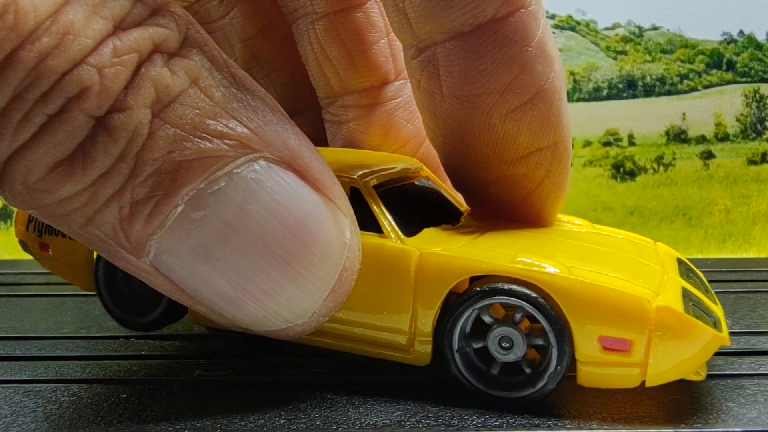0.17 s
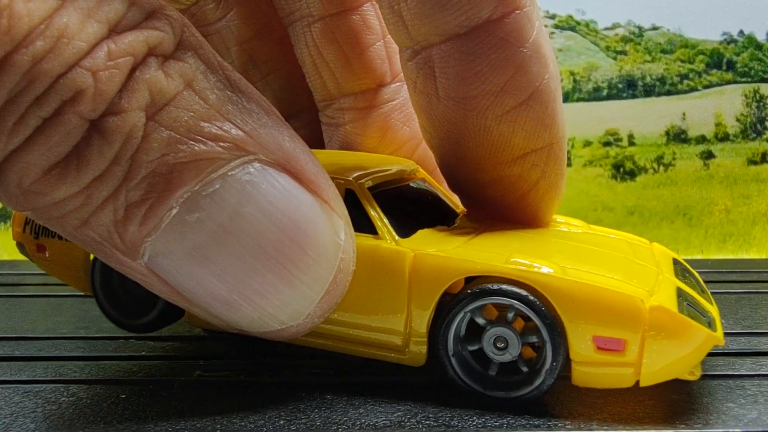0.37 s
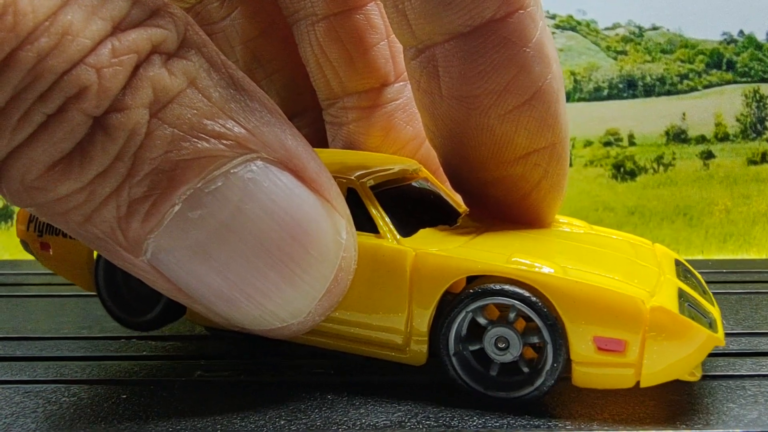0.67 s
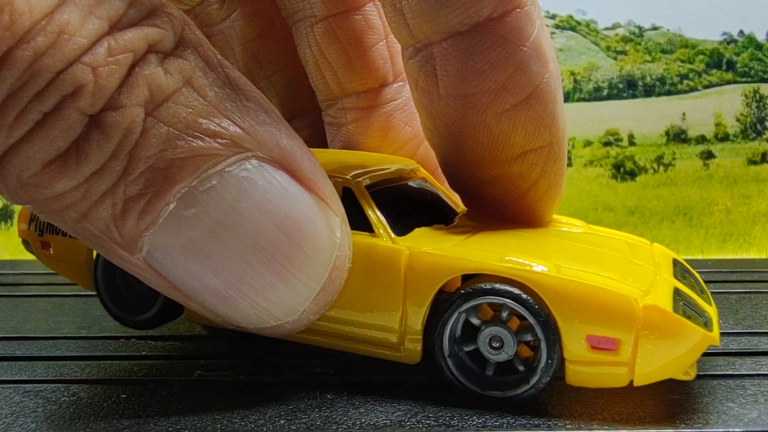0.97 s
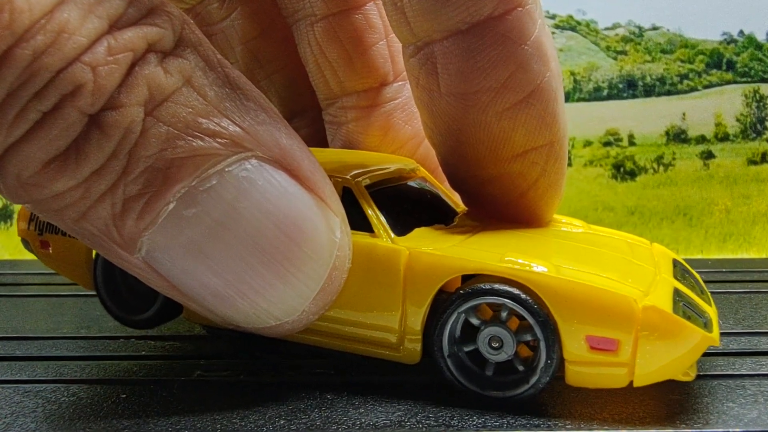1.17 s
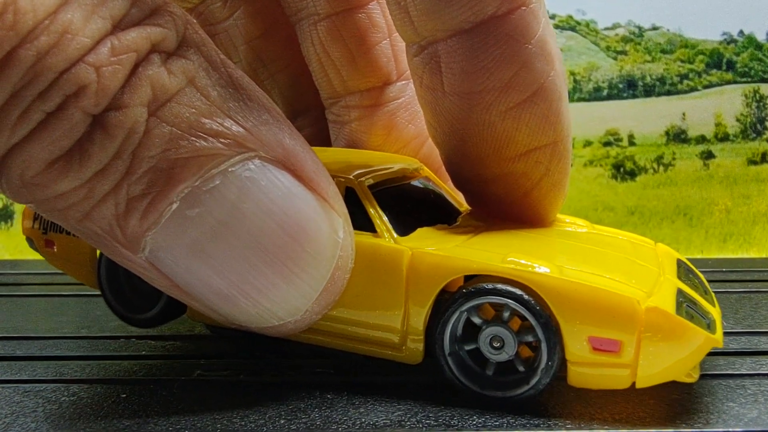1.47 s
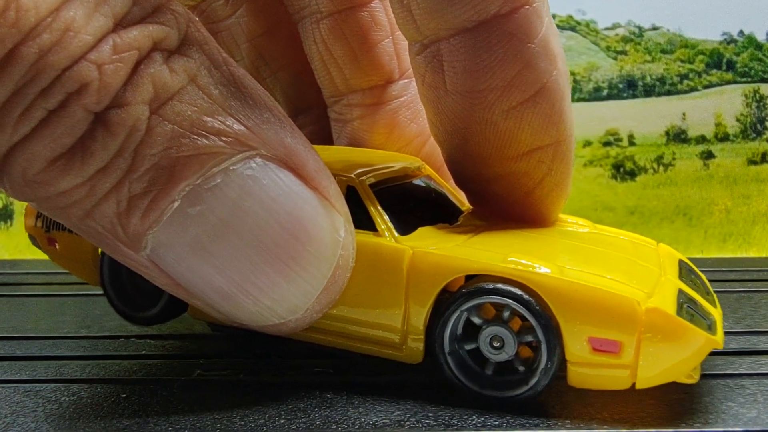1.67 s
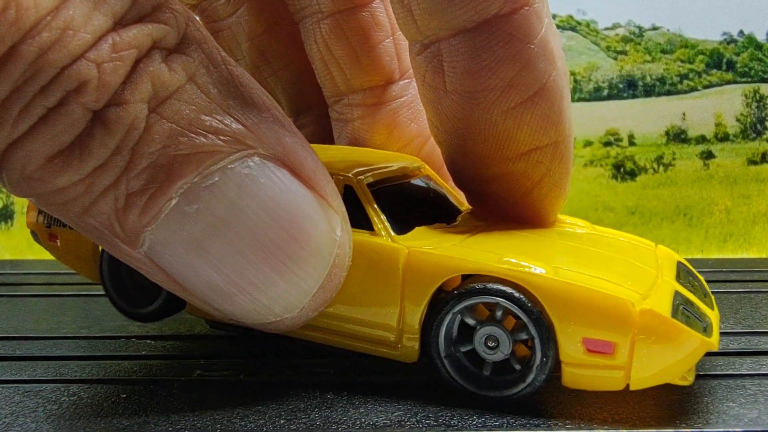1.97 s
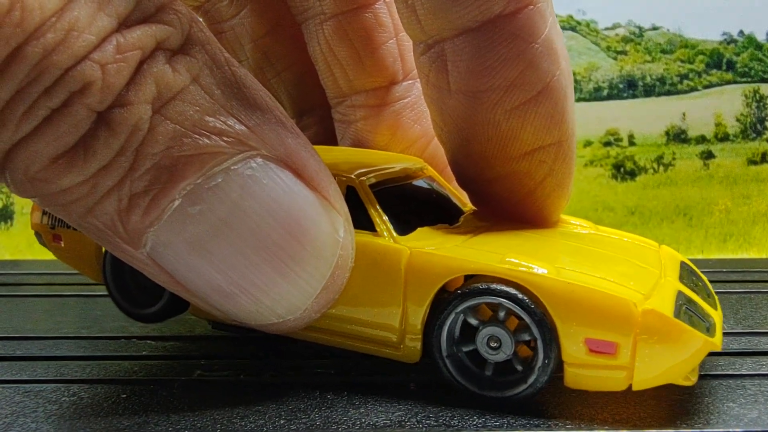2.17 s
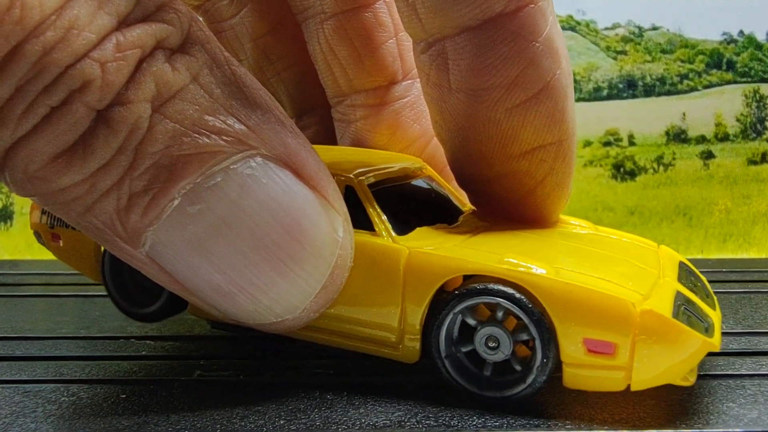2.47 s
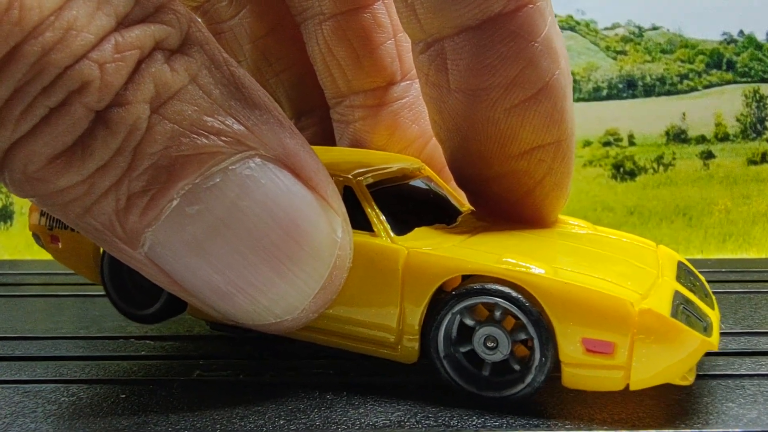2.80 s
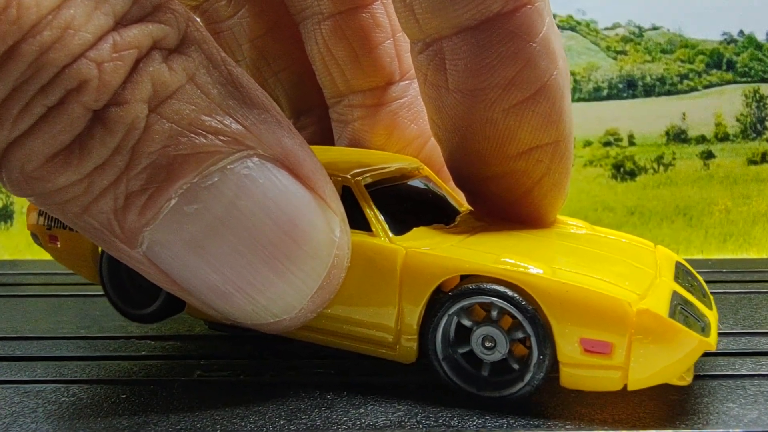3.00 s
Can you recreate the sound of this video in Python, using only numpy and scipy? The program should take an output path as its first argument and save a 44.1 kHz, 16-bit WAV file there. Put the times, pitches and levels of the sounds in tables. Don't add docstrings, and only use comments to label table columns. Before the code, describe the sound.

Small electric motor of a hand-held toy car whines shrill and hissy, sagging briefly, then recovering.

```python
import sys
import numpy as np
from scipy import signal
from scipy.fft import rfft, irfft, next_fast_len
from scipy.io import wavfile
from scipy.ndimage import map_coordinates

SR = 44100
rng = np.random.default_rng(int(sys.argv[2]) if len(sys.argv) > 2 else 0)


def magnitude_from_level(level_db):
    exponent = np.asarray(level_db, float) / 20
    return 10 ** exponent


def persist_wave(psi):
    counts = np.round(np.clip(psi, -1, 1) * 32767).astype(np.int16)
    wavfile.write(sys.argv[1], SR, np.atleast_2d(counts).T)


N = 138474
AXLE_PER_SHAFT = 7 / 25
FULL_SHAFT_HZ = 790


def unit(x):
    return x / np.sqrt(np.mean(x ** 2, axis=-1, keepdims=True))


def wobble(knots_per_s):
    at = np.arange(N) * knots_per_s / SR
    return map_coordinates(rng.standard_normal(N // 20), [at])


def filtered(x, response):
    m = next_fast_len(N + 8192)
    spectrum = rfft(x, m) * response(np.fft.rfftfreq(m, 1 / SR))
    return irfft(spectrum, m)[..., :N]


# (delay [s], left level [dB], right level [dB])
WALLS = [(.0022, -17, -11), (.0033, -24.5, -18), (.0048, -26, -39), (.0068, -12.5, -21), (.011, -6.5, -11)]


def air(f):
    direct_s, left_lead_s, can_hz, wall_skew_s = .001, .000205, 2000, .000498
    side = np.array([[1], [-1]])
    can_share = f ** 4 / (f ** 4 + can_hz ** 4)
    paths = np.exp(-2j * np.pi * f * (direct_s - side * left_lead_s / 2 * can_share))
    for k, (delay_s, *db) in enumerate(WALLS):
        port_delay_s = delay_s + (-1) ** k * side * wall_skew_s
        paths = paths + magnitude_from_level(db)[:, None] * np.exp(-2j * np.pi * f * port_delay_s)
    return paths


# (centre [Hz], width [Hz], left level [dB], right level [dB])
CHASSIS_MODES = [(347, 117, -33, -30), (703.4, 71, -21.5, -18.5), (937, 215, -22, -24),
                 (1220, 79, -22.5, -26), (1399, 114, -21, -27), (2120, 94, -43, -27),
                 (2530, 300, -24.5, -19.5), (3130, 360, -16.5, -16), (3620, 500, -20, -22),
                 (4187, 510, -36.5, -21.5), (4750, 970, -25, -28), (5530, 420, -29, -20.5),
                 (6194, 310, -22.5, -20.5), (6630, 350, -19.5, -25)]
# (centre [Hz], width [Hz], left level [dB], right level [dB])
CAN_MODES = [(7230, 294, -14, -6.5), (7833, 167, -4.5, -6.5), (8193, 960, -42, -5), (9120, 455, -9, -6.5),
             (9800, 430, -7, -21), (10150, 1500, -15, -38), (11200, 400, -20, -19),
             (11760, 940, -15.5, -22), (12930, 700, -17.5, -31), (13700, 700, -29, -29),
             (14640, 1000, -23.5, -24), (15500, 320, -29, -24)]
# (frequency [Hz], level [dB])
BODY_BED = [(25, -74), (100, -41), (250, -50), (500, -37.5), (2000, -31.5), (6000, -35.5), (11000, -23),
            (16000, -48.5)]


def body(f):
    bed_hz, bed_db = np.transpose(BODY_BED)
    bed = magnitude_from_level(2 * np.interp(np.log(f + 1), np.log(bed_hz), bed_db))
    power = bed * np.ones((2, 1))
    for centre, width, *db in CHASSIS_MODES + CAN_MODES:
        shape = 1 / (1 + ((f - centre) / width * 2) ** 2) ** 2
        power = power + magnitude_from_level(2 * np.array(db))[:, None] * shape
    return np.sqrt(power)


def hiss(turns):
    brush_gate, axle_gate, grit_db, grit_per_s = .2, .15, .62, 970
    shared, bass_alike_hz = .52, 250
    gate = 1 + brush_gate * np.cos(2 * np.pi * turns)
    gate = gate * (1 + axle_gate * np.cos(2 * np.pi * AXLE_PER_SHAFT * turns))
    noise = unit(rng.standard_normal((3, N)) * gate * magnitude_from_level(grit_db * wobble(grit_per_s)))

    def own(f):
        return np.sqrt((1 - shared) * f * f / (f * f + bass_alike_hz ** 2))

    def common(f):
        return air(f) * np.sqrt(1 - own(f) ** 2)

    return filtered(noise[0], common) + filtered(noise[1:], own)


# (time [s], level [dB])
EFFORT = [(0.0, -18), (0.06, -16.5), (0.5, -16.5), (0.52, -17.5), (0.66, -16.5), (0.71, -15.5), (0.94, -17),
          (0.97, -16), (1.98, -17), (3.03, -16), (3.09, -17.5), (3.14, -16.5)]


def friction(turns):
    motor_db = 21
    effort_db = np.interp(np.arange(N) / SR, *np.transpose(EFFORT)) + motor_db
    return filtered(magnitude_from_level(effort_db) * hiss(turns), body)


# (centre [Hz], width [Hz], gain [dB])
SHARP_MODES = [(225, 40, 13), (570, 60, 10), (685, 90, 19), (1590, 150, 6), (2380, 200, 11), (3130, 300, 9),
               (6330, 250, 6), (7150, 450, 13), (9750, 500, 18), (10150, 300, 11), (11230, 130, 9),
               (11850, 400, 3), (13400, 2400, 10)]


def rings(f):
    gain = 1
    for centre, width, db in SHARP_MODES:
        gain = gain + (magnitude_from_level(db) - 1) / (1 + ((f - centre) / width * 2) ** 2)
    return gain


# (time [s], shaft speed [Hz])
SHAFT = [(0, 804), (.26, 798), (.34, 785), (.41, 785), (.62, 626), (.67, 645), (.765, 762), (.89, 788),
         (1.12, 777.5), (1.3, 783), (1.37, 774), (1.46, 784), (1.585, 773.5), (1.85, 792), (2.2, 788),
         (2.33, 804), (2.58, 787), (3.14, 794)]


def shaft_speed():
    hunt, hunt_per_s, shiver, shiver_per_s = .0026, 20, .0018, 70
    course_hz = np.interp(np.arange(N) / SR, *np.transpose(SHAFT))
    return course_hz * (1 + hunt * wobble(hunt_per_s) + shiver * wobble(shiver_per_s))


# (shaft multiple [1], axle multiple [1], left level [dB], right level [dB], left lead [rad])
TONES = [(0, 1, -48.5, -49.5, .7), (1, -1, -46, -59, -2.6), (1, 0, -45, -41, 2.8), (1, 1, -47, -43, 0),
         (2, 0, -45, -42, -.3), (3, 0, -42, -44, -.6), (4, 0, -38, -43, -1), (5, 0, -48, -47, -.6),
         (6, 0, -42, -41, -2.5), (7, 0, -45, -44, -1.2), (8, 0, -36, -35, 3), (9, 0, -41, -31, -1),
         (11, 0, -38, -30, 2.2), (12, 0, -28, -31, -2.6), (13, 0, -22.5, -33, 1.2),
         (14, 0, -21.5, -32, 1.4), (15, 0, -26.5, -27, 3), (16, 0, -41, -44, -1), (17, 0, -46, -48, 2.4),
         (18, 0, -46, -48, -.6), (19, 0, -47, -49, -.4), (20, 0, -37, -38, 0), (21, 0, -35, -39, -1.4),
         (22, 0, -37, -40, 0)]
SIDEBANDS = [(14, -1, -33, -44, 1.4), (14, 1, -35, -45, 1.4), (14, 2, -36, -46, 1.4),
             (13, -1, -34, -43, 1.2)]
# (time [s], half width [s], gain [dB])
RUNOUT = [
    (.45, .05, 9),
    (1.0, .14, 10),
]


def tones(hz, turns):
    flutter_db, flutter_per_s, speed_power = 2.2, 16, 2
    lost_s, lost_half_s, lost_db = .63, .045, -6
    t = np.arange(N) / SR
    out = np.zeros((2, N))
    runout_db = sum(db * np.exp(-((t - s) / half) ** 4) for s, half, db in RUNOUT)
    for shaft, axle, left_db, right_db, lead in TONES + SIDEBANDS:
        k = shaft + axle * AXLE_PER_SHAFT
        swell = rings(k * hz) / rings(k * FULL_SHAFT_HZ)
        port_phase = np.outer([.5, -.5], lead / np.maximum(swell, 1))
        phase = 2 * np.pi * (k * turns + rng.random()) + port_phase
        db = np.array([[left_db], [right_db]]) + flutter_db * wobble(flutter_per_s)
        if (shaft, axle) == (1, 1):
            db = db + runout_db
        out += np.sqrt(2) * magnitude_from_level(db) * swell * np.sin(phase)
    load_db = lost_db * np.exp(-((t - lost_s) / lost_half_s) ** 2)
    return out * (hz / FULL_SHAFT_HZ) ** speed_power * magnitude_from_level(load_db)


def scene():
    hz = shaft_speed()
    turns = np.cumsum(hz) / SR
    return friction(turns) + tones(hz, turns)


def top_cut(x):
    return signal.sosfilt(signal.butter(12, 16280, fs=SR, output="sos"), x)


def record(dry):
    clip, hardness, low_hz, top_hz = 1.05, 6, 60, 15760
    x = dry / (1 + np.abs(dry / clip) ** hardness) ** (1 / hardness)
    x = filtered(x, lambda f: (f < top_hz) * f ** 2 / (f ** 2 + low_hz ** 2))
    return top_cut(x)


dry = scene()
out = record(dry)
persist_wave(out)
```